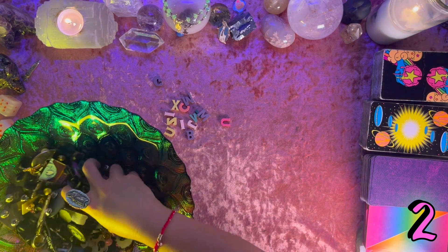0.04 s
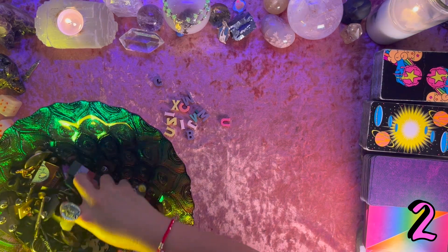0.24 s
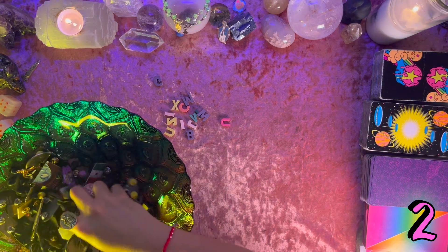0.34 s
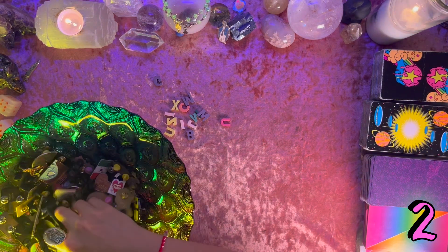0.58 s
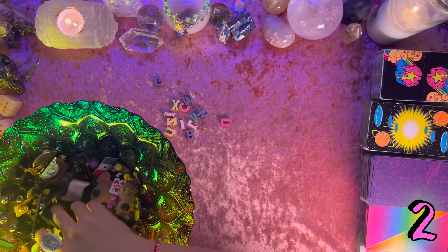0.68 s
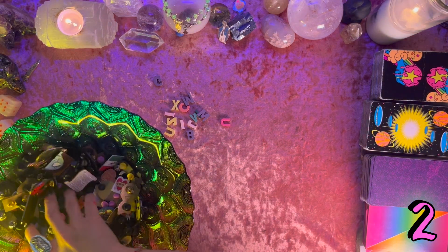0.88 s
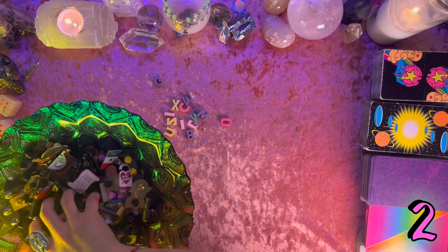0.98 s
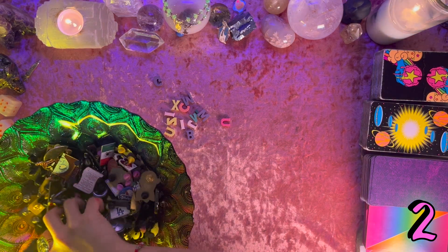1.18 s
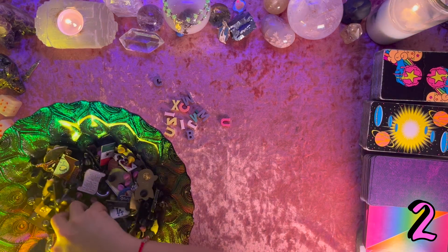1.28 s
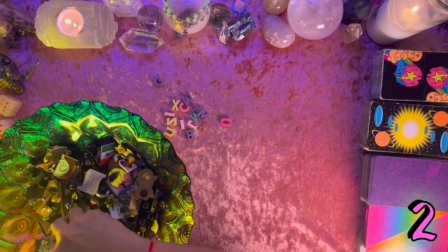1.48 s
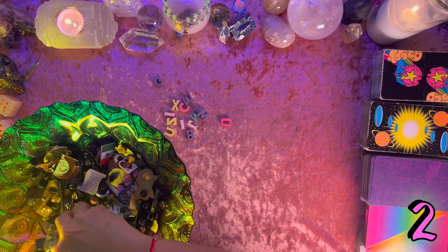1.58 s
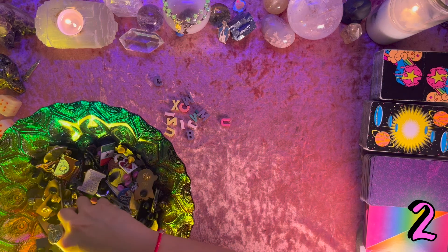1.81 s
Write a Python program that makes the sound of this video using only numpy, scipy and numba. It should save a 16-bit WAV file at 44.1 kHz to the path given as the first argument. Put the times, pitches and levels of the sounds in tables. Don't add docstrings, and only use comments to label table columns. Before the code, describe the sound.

Small metal charms rattle and clink as a hand stirs them in a ringing glass dish

```python
import sys
import numpy as np
from scipy import signal
from scipy.fft import rfft, irfft
from scipy.io import wavfile
from scipy.ndimage import uniform_filter1d
from numba import njit

SR = 44100
rng = np.random.default_rng(int(sys.argv[2]) if len(sys.argv) > 2 else 0)


def convert_level_to_amplitude(level_db):
    exponent = np.asarray(level_db, float) / 20
    return 10 ** exponent


def output_pcm(signal):
    pcm = np.clip(np.atleast_2d(signal).T, -1, 1) * 32767
    wavfile.write(sys.argv[1], SR, np.round(pcm).astype(np.int16))


N = 81585

# [f/Hz, level/dB per Hz]
ROOM_HISS = [(25, 0), (500, -10), (4500, -10), (16000, -35)]
# [f/Hz, level/dB per Hz]
RUB_NOISE = [(25, -29.5), (102, -2), (205, -5), (287, -15), (384, -9.5), (700, -14), (910, -4.5),
             (1540, -120)]
# [t/s, length/s, level/dB, boom f/Hz]
TABLE_SHOVES = [
    (.41, 0.14, -58.5, 104.4),
    (0.568, 0.12, -52, 145),
    (0.992, 0.055, -52.5, 245),
    (1.057, 0.12, -58, 88.5),
    (1.11, 0.14, -55.5, 200),
]
# [t/s, stirring level/dB, drag on glass level/dB, push on table level/dB]
HAND_MOVES = [(0, -60, -58, -68), (0.177, -71.5, -62, -74), (0.298, -39.5, -52.5, -70.5),
              (.45, -45.5, -55.5, -62.5), (.55, -49, -52.5, -62), (.63, -53.5, -48, -53.5),
              (.72, -45.5, -40, -72), (0.86, -61.5, -48.5, -67), (0.928, -52, -42, -64),
              (1.154, -44.5, -42.5, -58), (1.303, -59.5, -58, -66), (1.331, -88, -68.5, -76.5),
              (1.551, -82, -74, -69), (1.85, -91, -81.5, -87)]
# [f/Hz, level/dB, t60/s]
GLASS_MODES = [(391, -42, 0.051), (822, -22, 0.11), (1022, -22, 0.078), (1470, -17.5, 0.1),
               (1556, -4, 0.031), (2176, 9, 0.026), (2881, -1.5, 0.11), (3575, -0.5, 0.15),
               (4100, 19, 0.047), (6400, 12, 0.14)]
# [t/s, peak level/dB, favoured f/Hz, length/s]
GLASS_KNOCKS = [(0.568, -31.5, 822, .1), (0.653, -30.5, 2220, .01), (.698, -21, 600, 0.012),
                (0.733, -17.5, 2176, 0.0094), (.72, -17.5, 926, 0.03), (0.748, -15.5, 2176, .015),
                (0.893, -26, 3190, .015), (0.903, -24, 1470, 0.039), (.976, -26.5, 3500, 0.03),
                (1.058, -29.5, 2176, .015), (1.198, -33.5, 822, .02), (1.499, -43.5, 900, 0.024)]
# [t/s, peak level/dB]
CHIME_STRIKES = [
    (0.701, -24.5),
    (0.721, -38),
    (0.739, -25),
    (.748, -29.5),
    (.756, -32.5),
    (0.797, -18),
    (1.124, -28),
]
# [t/s, peak level/dB, f/Hz, t60/s]
CLEAN_STRIKES = [(.288, -28, 10060, 0.058), (.505, -32.5, 10040, .04), (.699, -23, 822, 0.041),
                 (0.797, -20.5, 3575, 0.066), (0.795, -20, 4075, 0.045), (.815, -25.5, 4020, 0.08),
                 (.796, -22, 5370, 0.07), (.796, -28.5, 6380, .03), (1.263, -41, 3680, 0.085),
                 (1.269, -42, 1470, 0.1), (1.275, -47.5, 616, .1), (1.566, -50, 8870, .04),
                 (1.578, -39, 8800, 0.08), (1.579, -41, 10910, 0.079), (1.58, -41.5, 7280, 0.046)]
# [t/s, peak level/dB]
ROCKING = [
    (1.504, -58),
    (1.521, -53),
    (1.543, -44.5),
    (1.578, -46.5),
    (1.59, -46),
    (1.598, -45.5),
    (1.614, -52),
]
ROCKING_HZ = (2500, 2587)
# [f/Hz, width/Hz, level/dB]
CHARM_MODES = [(4302, 420, -0.5), (5130, 240, -4.5), (6580, 200, 3.5), (11600, 40, -3), (14500, 190, -1.5)]
# [f/Hz, level/dB per Hz]
HEAP_TONE = [(1500, -48), (3300, -18), (4200, -10.5), (6600, -11.5), (10500, -18), (14600, -15.5),
             (16000, -28.5)]
# [t/s, peak level/dB, ring f/Hz]
DRY_TICKS = [(0.0065, -39, 6400), (0.1386, -44, 6550), (0.2036, -29, 6700), (0.22, -28, 6400),
             (0.243, -30, 3800), (0.2579, -28, 6300), (0.29, -23.5, 10070), (0.3142, -22, 5900),
             (0.3245, -19, 6700), (0.3496, -16, 4440), (0.361, -19.5, 7150), (0.4557, -29, 4320),
             (0.501, -19.5, 4400), (0.5363, -20, 5930), (0.5856, -27.5, 5340), (0.599, -28, 6470),
             (0.6351, -22, 4330), (0.6672, -18, 4840), (0.9744, -25, 3630), (0.9853, -23.5, 3890),
             (1.0218, -27, 14000), (1.0575, -30, 6700), (1.1209, -17.5, 6750), (1.1285, -17, 6300),
             (1.1335, -18.5, 6740), (1.1566, -21, 6220), (1.17, -19.5, 7020), (1.1749, -20.5, 6800),
             (1.1997, -27.5, 6900), (1.231, -29.5, 8840), (1.2644, -30, 3740), (1.2751, -29.5, 3780),
             (1.3223, -45, 2630), (1.3509, -54, 2700), (1.4366, -50.5, 4340), (1.4463, -51, 5800),
             (1.4777, -48, 6020), (1.501, -45, 8700), (1.5188, -42, 6650), (1.5254, -42.5, 6000),
             (1.5352, -42, 2520), (1.5532, -44, 2540), (1.6573, -50, 5190), (1.6721, -54, 6370),
             (1.715, -48.5, 5820), (1.7373, -50, 4430), (1.7825, -44, 6450)]
# [t/s, peak level/dB, first ring f/Hz, second ring f/Hz, length/s]
STIRRING = [(0.0014, -38.5, 6360, 14900, 0.021), (0.1345, -44, 5274, 10900, 0.029),
            (0.2015, -31, 6630, 8600, 0.017), (0.2866, -26.5, 6610, 9700, 0.022),
            (0.311, -25, 4370, 11600, 0.036), (0.338, -21.5, 4433, 14600, 0.024),
            (0.375, -30, 6680, 3320, 0.034), (0.4245, -18.5, 14500, 11640, 0.024),
            (0.43, -27.5, 4430, 7260, 0.031), (0.4845, -22, 4480, 6430, 0.017),
            (0.505, -26.5, 4440, 6380, 0.027), (0.582, -29.5, 5210, 14800, 0.024),
            (0.619, -25, 4430, 14500, 0.02)]
# [t/s, peak level/dB, first ring f/Hz, second ring f/Hz, length/s]
SCOOPING = [
    (0.661, -26.5, 4350, 14500, 0.016),
    (0.733, -22, 6400, 5610, 0.047),
    (0.885, -27.5, 5500, 8020, 0.061),
    (0.9739, -28, 4050, 8330, 0.017),
    (1.056, -27, 5410, 7900, 0.037),
    (1.1204, -22.5, 6550, 12100, 0.026),
    (1.145, -17.5, 6460, 3990, 0.041),
    (1.25, -33.5, 6540, 8220, 0.05),
]
# [t/s, peak level/dB, first ring f/Hz, second ring f/Hz, length/s]
SETTLING = [(0.305, -21.5, 3237, 2697, 0.085), (0.191, -37, 3375, 6400, 0.008),
            (1.3223, -49, 2490, 7030, 0.0095), (1.3825, -48, 6420, 2320, 0.013),
            (1.399, -52.5, 4900, 6400, 0.022), (1.434, -53, 4390, 6400, 0.02),
            (1.471, -49.5, 2600, 6130, 0.0091), (1.501, -51, 2510, 8600, 0.015),
            (1.518, -45, 6150, 7600, 0.014), (1.5347, -45.5, 5760, 7000, 0.02),
            (1.5662, -47, 5740, 8150, 0.0075), (1.578, -36, 6160, 4260, 0.03),
            (1.6098, -48.5, 5880, 11050, 0.0063), (1.7118, -46, 2474, 5830, 0.018),
            (1.736, -54.5, 2520, 4430, 0.017), (1.7705, -61, 2500, 7400, 0.0036),
            (1.782, -54, 4090, 6480, 0.0044), (1.795, -60, 4640, 6670, 0.018)]

CRACK_T60_S = 0.022


def level(x, db):
    return x * convert_level_to_amplitude(db) / np.sqrt(np.mean(x ** 2))


def curve(table, hz):
    rows = np.array(table)
    return np.interp(np.log(hz), np.log(rows[:, 0]), rows[:, 1])


def colour(x, table):
    hz = np.arange(len(x) // 2 + 1) * SR / len(x) + 1
    return irfft(rfft(x) * convert_level_to_amplitude(curve(table, hz)), len(x))


def walk(rate):
    hold = int(SR / rate)
    steps = np.repeat(rng.standard_normal(N)[:N // hold + 1], hold)
    return uniform_filter1d(steps, hold)[:N]


@njit
def add(out, start, hz, t60, gain):
    for k in range(len(hz)):
        turn = np.exp((2j * np.pi * hz[k] - np.log(1000) / t60[k]) / SR)
        z = gain[k] + 0j
        first = max(int(start[k] * SR), 0)
        last = min(int((start[k] + t60[k]) * SR), len(out))
        for i in range(first, last):
            out[i] += z.imag
            z *= turn
    return out


def rings(start, hz, t60, db):
    columns = np.broadcast_arrays(start, np.clip(hz, 50, 20000), t60, convert_level_to_amplitude(db))
    s, f, t, g = (np.ascontiguousarray(c, float).ravel() for c in columns)
    out = add(np.zeros(N), s, f, t, g)
    return add(out, s, f, 8 / f, -g)


def hand(column):
    rows = np.array(HAND_MOVES)
    return np.interp(np.arange(N) / SR, rows[:, 0], rows[:, column])


def contacts(s, db, length, u):
    k = np.arange(8)[:, None]
    place = (k + u[..., :1]) / 8 * (k > 0)
    size = db - 3.5 * place - 9 * u[..., 1:2] * (place > 0)
    return s + place * np.abs(length), size


def cracks(when, db, table, t60=CRACK_T60_S):
    at = np.clip(when * SR, 0, N - 1).astype(int).ravel()
    hits = np.bincount(at, convert_level_to_amplitude(db).ravel(), N)
    noise = rng.standard_normal(N)
    spit = signal.lfilter([1], [1, -convert_level_to_amplitude(-60 / (t60 * SR))], hits) * noise
    return colour(spit, table) / np.std(colour(noise, table)) / 2


def room_tone():
    return level(colour(rng.standard_normal(N), ROOM_HISS), -88)


def room_tail(near):
    t = np.arange(SR // 2) / SR
    t60_s = 0.12
    tail = rng.standard_normal(len(t)) * convert_level_to_amplitude(-60 * t / t60_s) * (t > .002)
    return convert_level_to_amplitude(-12) * signal.fftconvolve(near, tail / np.sqrt(np.sum(tail ** 2)))[:N]


def table_rub():
    rumble = colour(rng.standard_normal(N), RUB_NOISE + [(3000, -69.0)])
    return level(rumble, 0) * convert_level_to_amplitude(hand(3) + 2 * walk(22.75))


def shoves():
    t, out = np.arange(N) / SR, 0
    for s, length, db, hz in TABLE_SHOVES:
        band = [(hz / 2, -40), (hz * .9, 0), (hz * 1.1, 0), (hz * 2, -40)]
        boom = colour(rng.standard_normal(N), band)
        out = out + level(boom, db) * np.sin(np.pi * np.clip((t - s) / length, 0, 1))
    return out


def knocks():
    f, g, t60 = np.array(GLASS_MODES).T
    s, db, focus, length = np.array(GLASS_KNOCKS).T[:, :, None, None]
    u = rng.random((30, 8, 16))[:len(s)]
    when, size = contacts(s, db - 6.5, length, u)
    slide = length * (u[..., :5:-1] - .5)
    focus_db = -23 * np.abs(np.log2(f / focus))
    mode_db = size + 0.19 * g + focus_db - 6 * u[..., 2:2 + len(f)]
    out = rings(when, f * (1 + slide), t60, mode_db)
    crack_db = size - 5.5 - 6 * np.log2(focus / 800)
    return out + cracks(when, crack_db, [(150, -23), (900, -11.5), (8000, -22.5)])


def scrape():
    v = rng.random((4000, 4))
    mode = (v[:, 1] ** 2 * len(GLASS_MODES)).astype(int)
    f, g, t60 = np.array(GLASS_MODES)[mode].T
    hz = f * (1 + 0.34 * (v[:, 3] - .5) * v[:, 2])
    db = 0.63 * g - 7 * np.log2(f / 800) - 2 * np.log(v[:, 2])
    drag = rings(v[:, 0] * N / SR, hz, 0.33 * t60, db)
    return level(drag, -1) * convert_level_to_amplitude(hand(2))


def chime():
    hz = 2889.5
    hit, hit_db = np.array(CHIME_STRIKES).T
    return rings(np.round(hit * hz) / hz, hz, 0.11, hit_db)


def clean_strikes():
    s, db, hz, t60 = np.array(CLEAN_STRIKES).T[:, :, None]
    u = rng.random((20, 6))[:len(s)]
    when = s + u[:, :3] * t60 / 10 * [0, 1, 2]
    split_hz = 70 * np.sqrt(hz / 2889.5)
    return rings(when, hz + split_hz * (u[:, 3:] - .5), t60, db - 4.5)


def rocking_charm():
    when, size = np.array(ROCKING).T[:, :, None]
    hz = np.array(ROCKING_HZ) * (1 + 0.023 * rng.standard_normal((12, 2))[:len(when)])
    return rings(when, hz, 0.039, size)


def rattle():
    t60_s, scatter_db = 0.02, 3.5
    u = rng.random((3000, 4))
    size = -scatter_db * np.log(u[:, 3] + .05)
    hz = 2200 * 7 ** u[:, 1]
    loose_db = size + curve(HEAP_TONE, hz) + 10 * np.log10(hz)
    loose = rings(u[:, 0] * N / SR, hz, t60_s * (0.3 + u[:, 2]), loose_db)
    v = rng.random((2000, 5))
    f, width, db = np.array(CHARM_MODES)[(v[:, 1] * len(CHARM_MODES)).astype(int)].T
    tuned_hz = f + 1.94 * width * (v[:, 4] - .5)
    tuned_db = db - scatter_db * np.log(v[:, 3] + 0.1)
    tuned = rings(v[:, 0] * N / SR, tuned_hz, 2 * t60_s * (0.047 + v[:, 2]), tuned_db)
    hiss = colour(rng.standard_normal(N), HEAP_TONE)
    heap = level(loose, 0) + level(tuned, 0) + level(hiss, -0.5)
    return heap * convert_level_to_amplitude(1.5 + hand(1) - 1.5 * walk(43.8))


def ticks():
    t60_s = 0.015
    s, db, hz = np.array(DRY_TICKS).T[:, :, None]
    u = rng.random((60, 8))[:len(s)]
    main = rings(s, hz, t60_s, db - 2.5)
    near_hz = hz * (1 + 0.23 * (2 * u[:, :4] - 1))
    near = rings(s + .001 * u[:, 4:], near_hz, t60_s / 2, db - 8.5)
    return main + near + cracks(s, db - 5, HEAP_TONE, t60_s / 2)


def clinks(table, body_db, crack_db, t60, spread):
    s, db, low, high, length = np.array(table).T[:, :, None, None]
    u = rng.random((30, 8, 12))[:len(s)]
    when, size = contacts(s, db - 5.5, length, u)
    bend = u[..., 2:3] - .5
    lower = rings(when, low * (1 + spread * bend), t60, size)
    upper = rings(when, high * (1 + 0.038 * bend), 1.6 * t60, size - 1 - 8 * u[..., 3:4])
    side_hz = 2.1 * low * (22000 / low) ** u[..., 4:8]
    side_t60 = 0.055 * (0.038 + .5 * u[..., 8:])
    side = rings(when, side_hz, side_t60, size + 0.66 * curve(HEAP_TONE, side_hz))
    crack = cracks(when, size + crack_db, HEAP_TONE)
    body = cracks(when, size + body_db, [(150, -17), (2600, -0.5), (5000, -31.5)])
    return lower + upper + side + crack + body


def scene():
    near = table_rub() + shoves()
    near = near + knocks() + scrape() + chime() + clean_strikes()
    near = near + rocking_charm() + rattle() + ticks()
    near = near + clinks(STIRRING, body_db=-20, crack_db=2.0, t60=0.055, spread=0.035)
    near = near + clinks(SCOOPING, body_db=-9.0, crack_db=3.9, t60=0.037, spread=0.12)
    near = near + clinks(SETTLING, body_db=-11.5, crack_db=0, t60=0.02, spread=0.16)
    return (near + room_tail(near) + room_tone())[None]


def band_limit(x):
    return signal.sosfilt(signal.butter(12, 16340, fs=SR, output="sos"), x)


def record(dry):
    top_cut = signal.ellip(8, .2, 70, 15800, fs=SR, output="sos")
    mix = signal.sosfilt(top_cut, dry)
    return band_limit(mix)


dry = scene()
out = record(dry)
output_pcm(out)
```